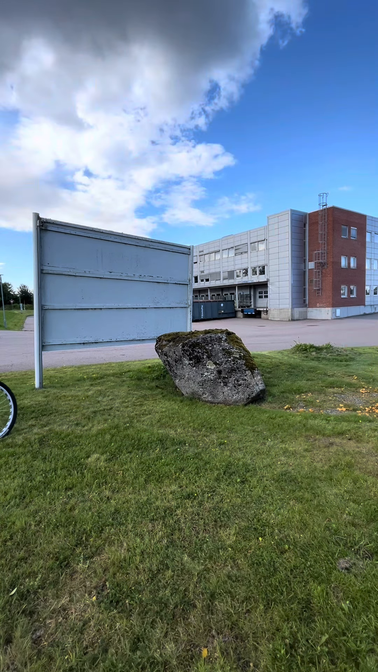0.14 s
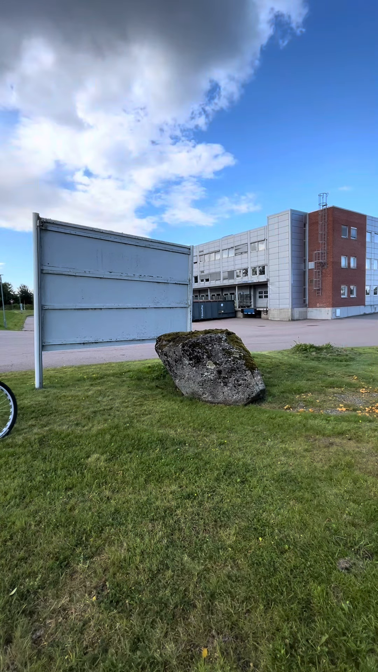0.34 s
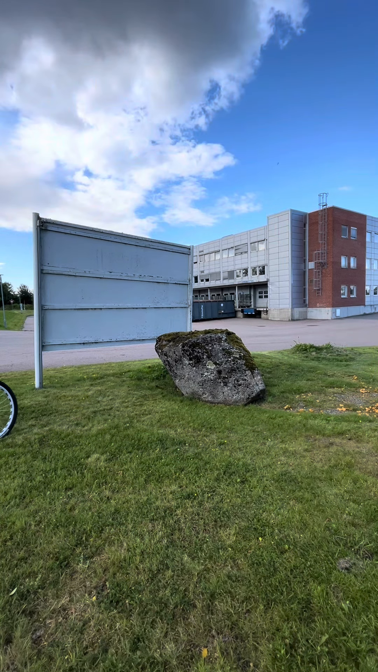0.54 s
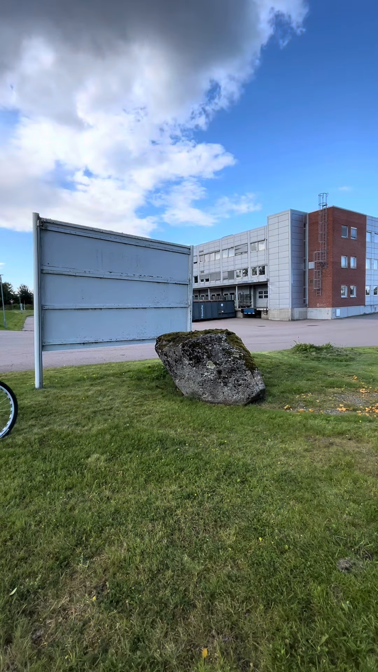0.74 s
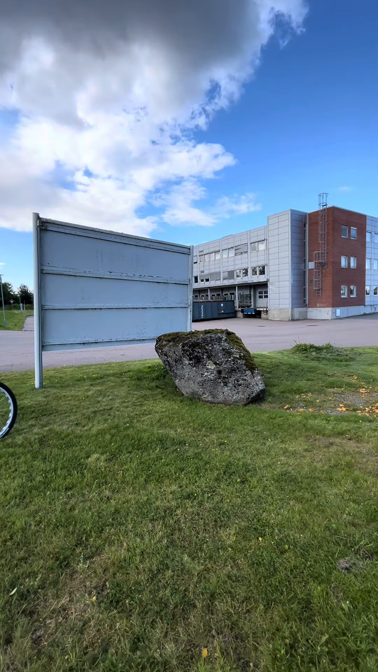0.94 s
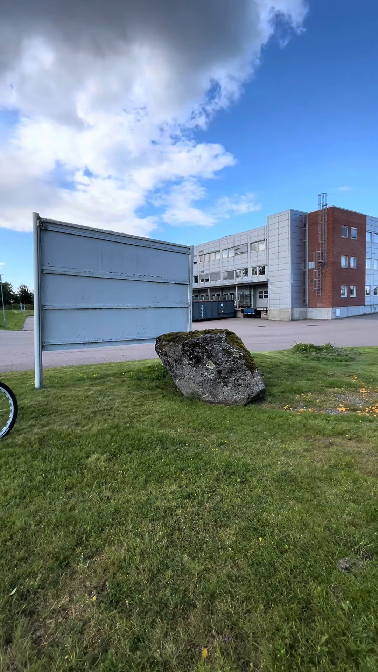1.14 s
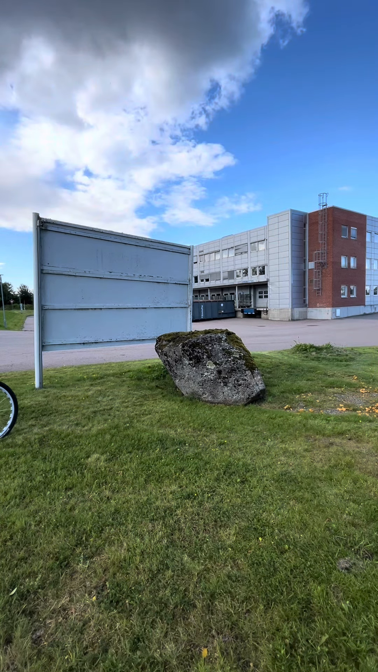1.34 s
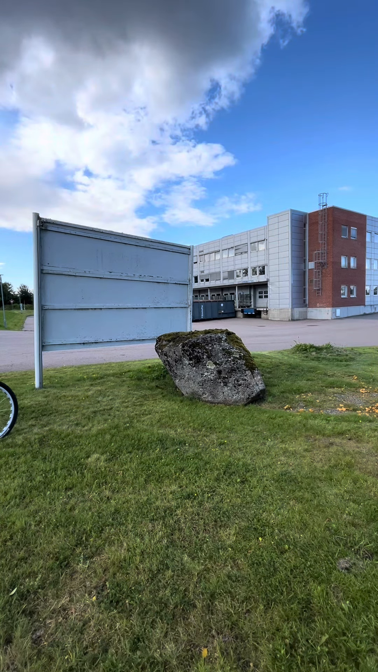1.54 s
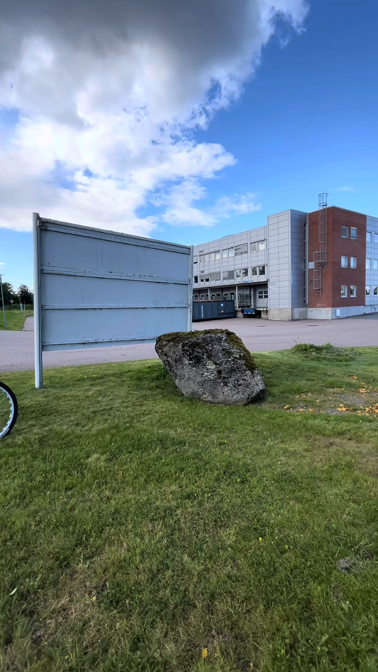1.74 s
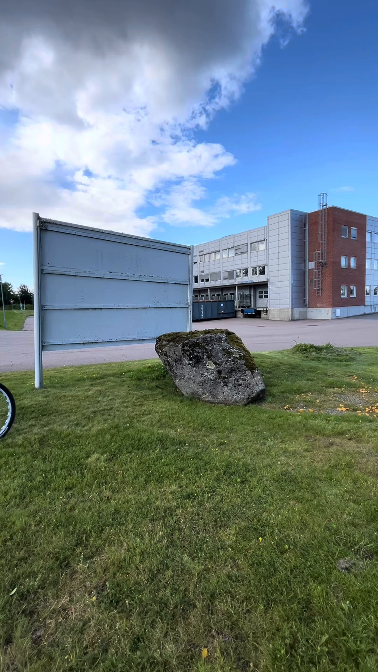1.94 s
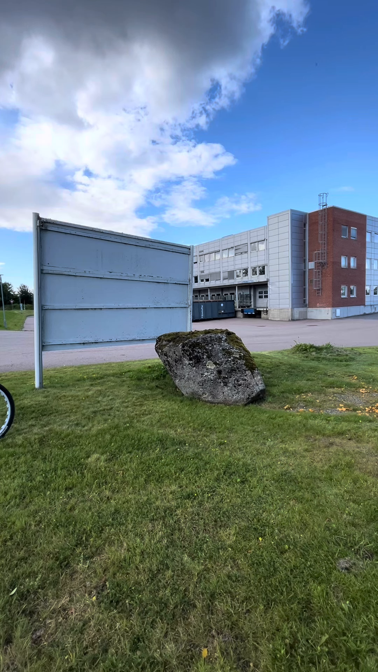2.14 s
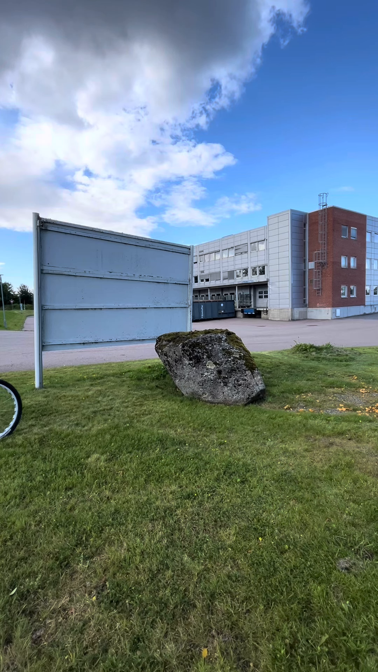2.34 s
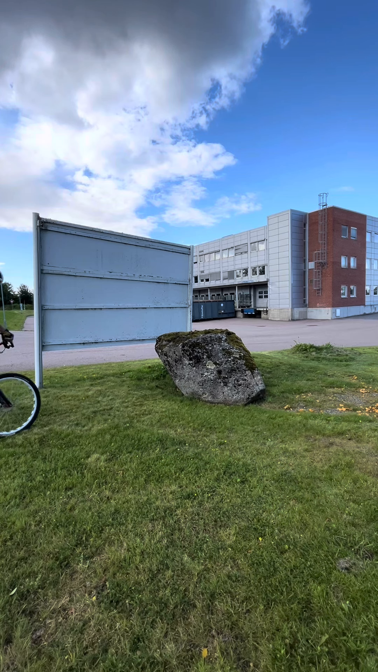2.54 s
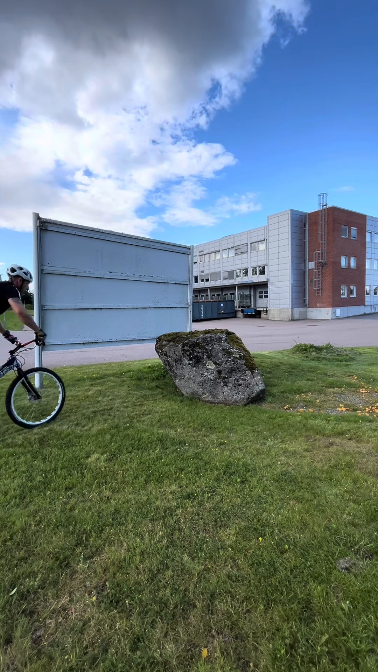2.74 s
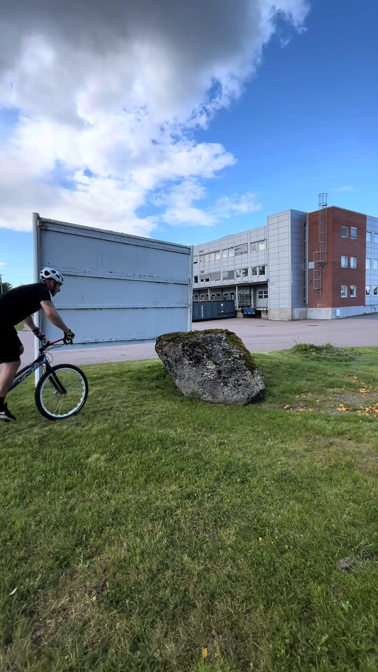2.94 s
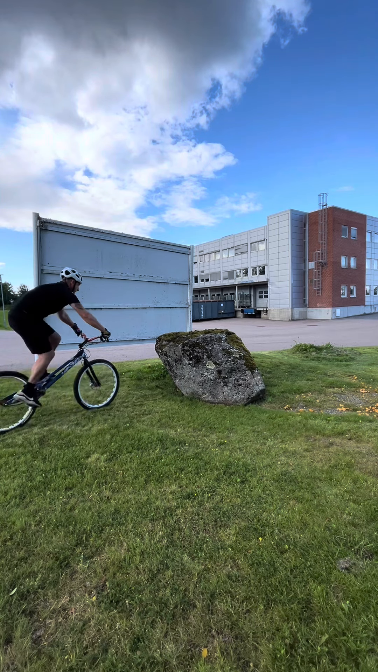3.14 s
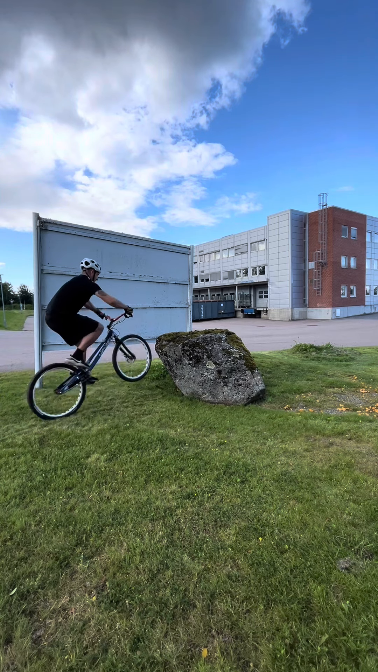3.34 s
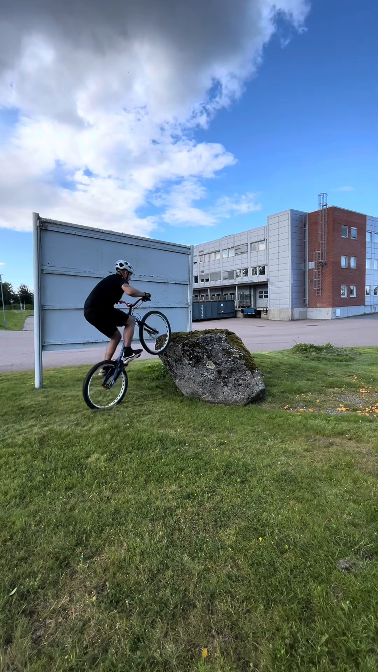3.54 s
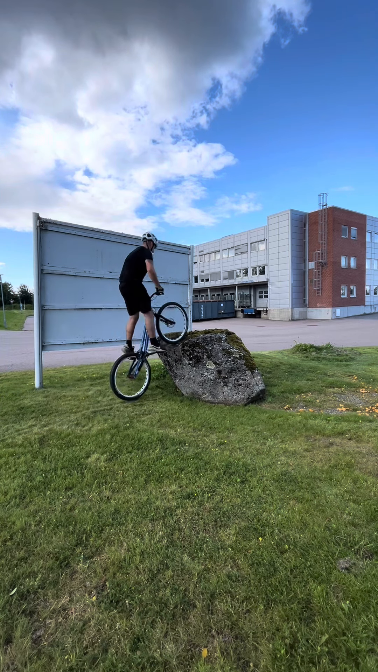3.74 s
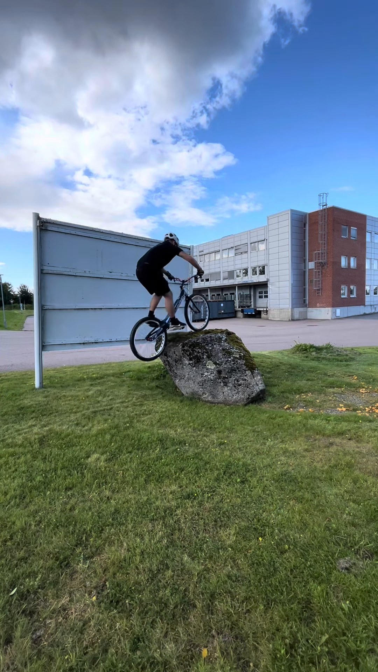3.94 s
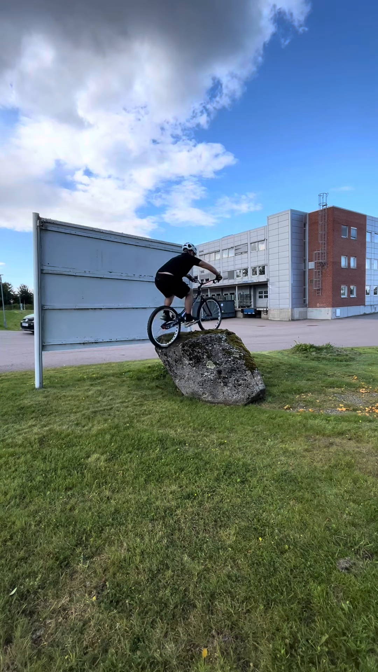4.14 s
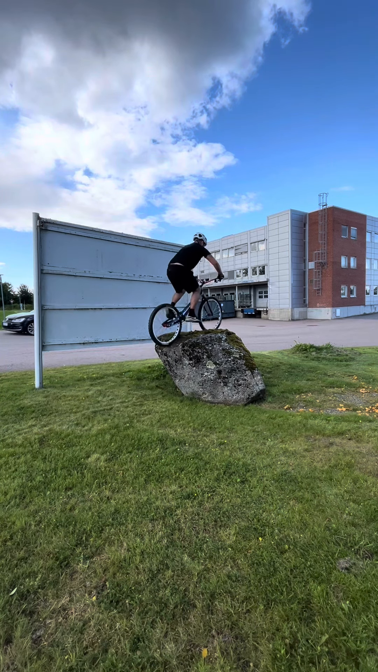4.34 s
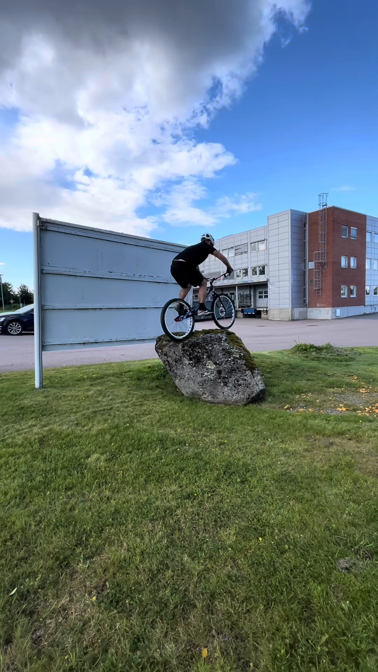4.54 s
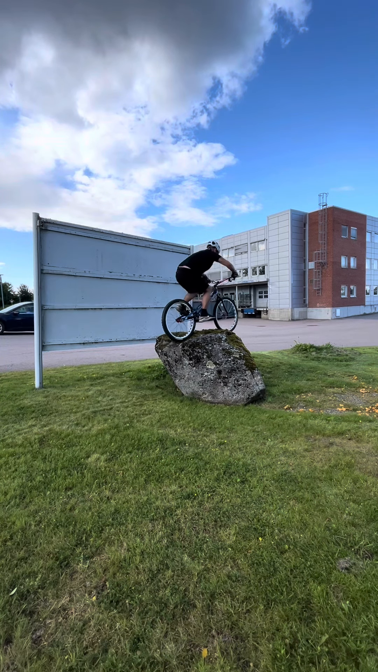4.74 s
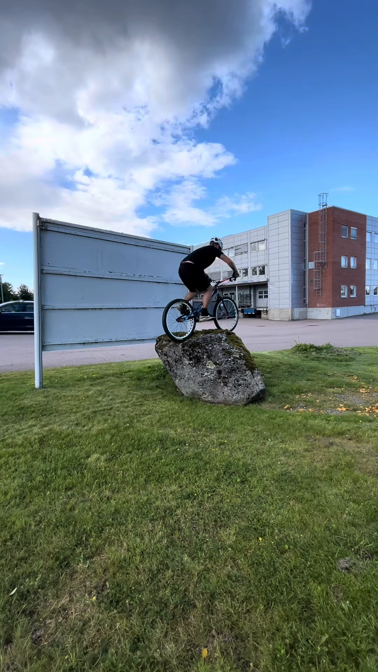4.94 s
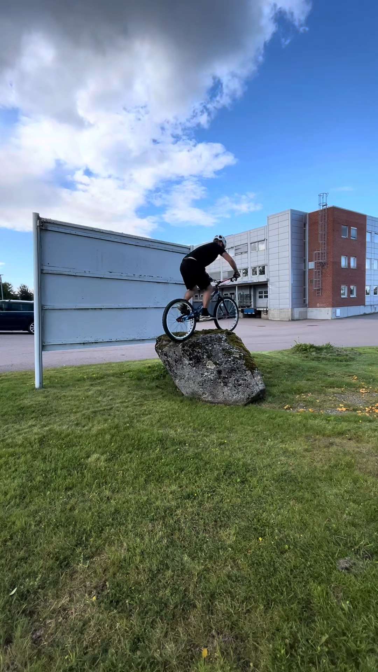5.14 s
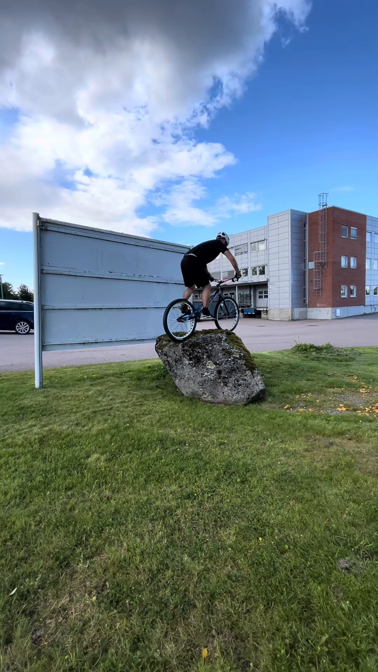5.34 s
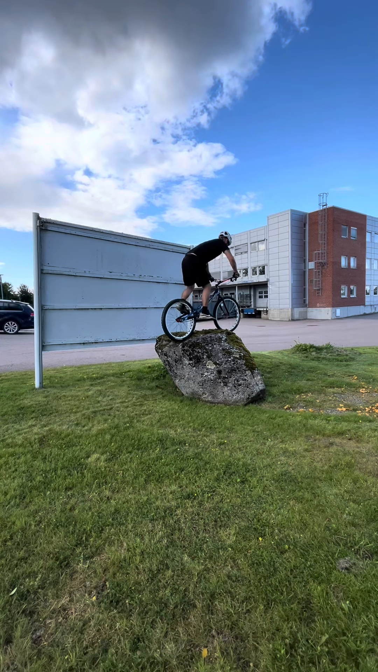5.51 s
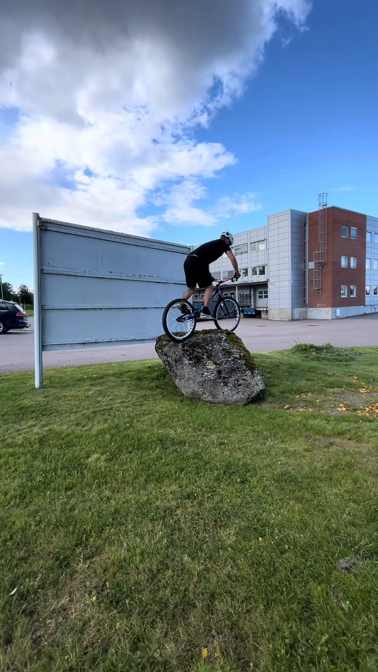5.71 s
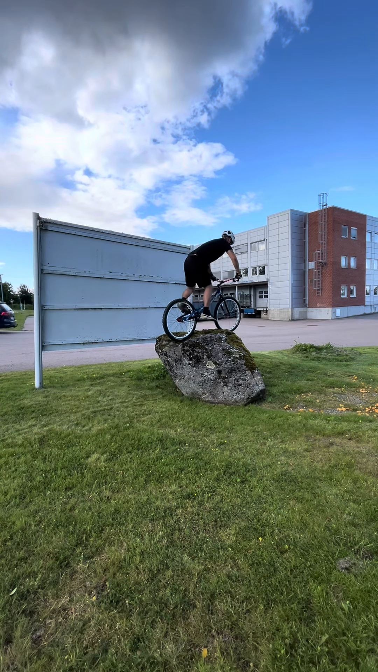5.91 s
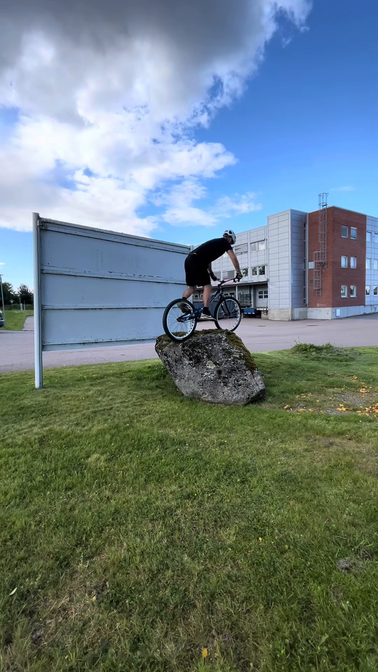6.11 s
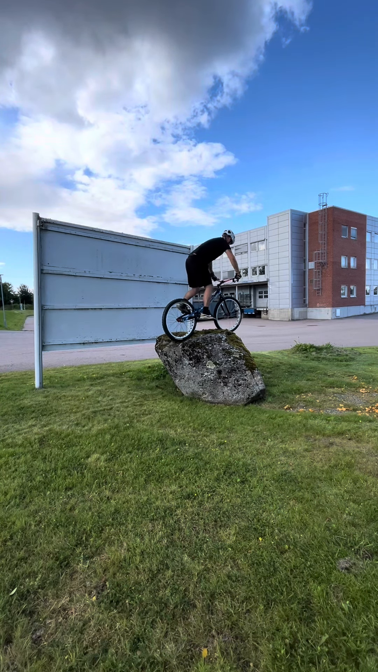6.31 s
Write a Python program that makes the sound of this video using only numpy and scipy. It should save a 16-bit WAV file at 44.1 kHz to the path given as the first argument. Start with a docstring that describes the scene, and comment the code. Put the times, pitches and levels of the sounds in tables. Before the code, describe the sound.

Wind buffets the microphones over distant traffic and a steady hum while a bicycle freewheel ticks close by. The ticks thicken and the chain rattles, then the bike hops onto a boulder: wheel and frame knock, the brake gives one short loud squeal, and the tyres thud softly twice. A car draws nearer in the background until the end. The sound is stereo, in an open yard with a faint echo.

```python
"""A trials bicycle in a yard, heard close on a stereo pair of microphones, with traffic far off.
At first wind buffets the microphones over the road wash and a steady hum, while the freewheel ticks
across the grass. From about 2 s a car draws nearer. Near 4 s the bicycle hops onto a boulder: wheel and
frame knock, the brake pads stick and slip on the rim in one loud squeal, and the tyres thud down.
The yard adds a faint tail to ticks, knocks and squeal; the car is still approaching at the end."""
import sys
import numpy as np
from scipy import signal
from scipy.fft import rfft, irfft, next_fast_len
from scipy.io import wavfile
from scipy.ndimage import uniform_filter1d

SR = 44100
rng = np.random.default_rng(int(sys.argv[2]) if len(sys.argv) > 2 else 0)


def digitize_waveform(pressure):
    """Quantize a signal to 16-bit integers and store it at the path in sys.argv[1].

    Rows of a 2-D input are taken as channels; values are limited to [-1, 1].
    """
    field = np.atleast_2d(pressure).T
    bounded = np.clip(field, -1, 1)
    quanta = np.round(bounded * 32767).astype(np.int16)
    wavfile.write(sys.argv[1], SR, quanta)


N = 280869


def amp(db):
    """Decibels to gain."""
    return 10 ** (np.asarray(db) / 20)


def unit_rms(x):
    """Scales to rms 1."""
    return x / np.sqrt(np.mean(x ** 2) + 1e-20)


def at_hz(table, hz, column=1):
    """Reads one column of a table over log frequency."""
    columns = np.transpose(table)
    return np.interp(np.log(hz + 1), np.log(columns[0] + 1), columns[column])


def fader(curve):
    """Gain at every sample from (time_s, level_db) rows."""
    return amp(np.interp(np.arange(N) / SR, *np.transpose(curve)))


def swells(rows, edge_s):
    """Gain at every sample from (start_s, length_s, level_db) rows with soft edges."""
    t = np.arange(N) / SR
    return sum(amp(db) * np.clip(np.minimum(t - start, start + length - t) / edge_s, 0, 1) ** 2
               for start, length, db in rows)


def add(mix, start_s, sound):
    """Mixes a sound in at its start time."""
    part = mix[round(start_s * SR):][:len(sound)]
    part += sound[:len(part)]


def resonate(x, hz, width_hz):
    """A resonance of gain 1: one decaying, turning pole."""
    radius = np.exp(-np.pi * width_hz / SR)
    return 2 * signal.lfilter([1 - radius], [1, -radius * np.exp(2j * np.pi * hz / SR)], x).real


def narrow_band(x, hz, width_hz):
    """The same resonance twice, for steeper sides."""
    return resonate(resonate(x, hz, width_hz), hz, width_hz)


def waver(count, span):
    """A random curve of rms 1, smoothed twice over span samples."""
    return unit_rms(uniform_filter1d(uniform_filter1d(rng.standard_normal(count), span), span))


def coloured(x, spectrum):
    """Gives noise a spectrum."""
    return irfft(rfft(x) * amp(at_hz(spectrum, np.fft.rfftfreq(len(x), 1 / SR))), len(x))


def noise_pair(spectrum, patchy_db):
    """Two unrelated noises sharing one spectrum and its drifting louder and softer patches."""
    frames, hz = N // 256 + 5, np.fft.rfftfreq(1024, 1 / SR)
    a, b, c, d, patches = rng.standard_normal((frames, 513, 5)).T
    patches = unit_rms(uniform_filter1d(uniform_filter1d(patches, 10, 0), 14, 1))
    spectra = np.array([a + 1j * b, c + 1j * d]) * amp(at_hz(spectrum, hz)[:, None] + patchy_db * patches)
    return unit_rms(signal.istft(spectra, nperseg=1024, noverlap=768)[1][:, :N])


def microphones(position, direct, scattered, treble_likeness):
    """Both microphones hear the direct sound; only the right one hears the scattered share."""
    treble_from_hz, right_lag_s = 5200, 2.42e-4
    size = next_fast_len(N)
    hz = np.fft.rfftfreq(size, 1 / SR)
    direct, scattered = rfft(direct, size), rfft(scattered, size)
    treble = hz > treble_from_hz
    phase = np.where(treble, -2 * np.pi * hz * right_lag_s, at_hz(position, hz))
    likeness = np.clip(np.where(treble, treble_likeness, at_hz(position, hz, column=2)), 0, 1)
    lean_left = amp(np.where(treble, 0, at_hz(position, hz, column=3)) / 2)
    right = likeness * direct * np.exp(1j * phase) + np.sqrt(1 - likeness ** 2) * scattered
    return irfft(np.array([direct * lean_left, right / lean_left]), size)[:, :N]


# Spectrum of wind on the microphones: frequency_hz, relative_db
WIND_SPECTRUM = [(20, -32), (45, 17.5), (90, 8.5), (180, 3), (300, -2), (500, -8), (900, -103)]
# Gusts, the first and strongest already blowing: start_s, length_s, level_db
GUSTS = [(-.3, 2.58, -39), (2.45, 1.2, -66), (4.0, 0.6, -64), (4.65, .5, -50), (5.45, 0.46, -66)]


def wind():
    """Right on the microphones: lumpy low buffeting that pushes the two in opposite directions."""
    lull_db = -71
    buffet, eddies = noise_pair(WIND_SPECTRUM, patchy_db=1.4) * (amp(lull_db) + swells(GUSTS, edge_s=0.23))
    return np.array([buffet + 0.27 * eddies, -buffet + 0.18 * eddies])


# Spectra of the far road's wash and low rumble: frequency_hz, relative_db
WASH_SPECTRUM = [(100, -51), (200, -11), (300, -8), (500, -12.5), (1000, -13.5), (2000, -26), (3200, -31.5),
                 (4500, -37), (7000, -40.5), (9000, -50.5), (12000, -93), (16000, -100)]
RUMBLE_SPECTRUM = [(30, 0), (60, 5), (130, -2.5), (250, -5.5), (350, -22), (600, -60)]
# Their rise and fall: time_s, level_db
WASH_LEVEL = [(0, -48.5), (3, -48.5), (4, -51), (6.37, -52)]
RUMBLE_LEVEL = [(0.0, -51), (0.35, -50), (0.55, -60), (0.8, -50), (1.3, -42.5), (1.5, -47.5), (1.75, -40),
                (1.95, -46), (2.3, -44), (3.3, -43.5), (4.4, -48.5), (4.8, -44.5), (5.5, -42.5),
                (6.37, -41)]
# The far road at the pair: frequency_hz, right_lead_rad, likeness_0_to_1, left_minus_right_db
ROAD_POSITION = [(39, 2, 1, 0), (199, 0.26, 1, -0.5), (380, 0, 1, -10.5), (495, 0.65, 0.77, -7),
                 (796, 4.5, 0.2, -4), (1090, 4.5, 0.38, -1.5), (1590, 7, 0.53, 0), (2460, 4, 0.77, -2),
                 (3460, 4, 0.2, -3.5), (4270, -8, 0.97, -1)]


def far_traffic():
    """In the distance: road wash, a rumble that comes in lumps, and a steady narrow hum."""
    hum_hz, hum_db, lump_db, lump_s = 363, -55.5, 2.5, 0.15
    drift = unit_rms(narrow_band(rng.standard_normal(N), hum_hz, width_hz=9))
    hum = amp(hum_db) * (np.sin(2 * np.pi * hum_hz * np.arange(N) / SR) + .3 * drift)
    lumps = amp(lump_db * waver(N, round(lump_s * SR)))
    wash = noise_pair(WASH_SPECTRUM, patchy_db=1.0) * fader(WASH_LEVEL)
    rumble = noise_pair(RUMBLE_SPECTRUM, patchy_db=0.84) * fader(RUMBLE_LEVEL) * lumps
    direct, scattered = wash + rumble
    return microphones(ROAD_POSITION, direct + hum, scattered, treble_likeness=.75)


# Freewheel and chain ticks: start_s, peak_db, brightest_pitch_hz
TICKS = [(0.1068, -44, 3900), (0.124, -37.5, 6600), (0.4385, -52, 3190), (0.9482, -54, 7600),
         (1.075, -63, 7600), (1.5305, -31, 8900), (1.5903, -30, 8820), (1.6, -32, 5240),
         (1.6797, -30, 12200), (1.7353, -42, 5190), (2.1745, -53, 4100), (2.4545, -45, 3640),
         (2.4897, -44, 8270), (2.5342, -42.5, 3310), (2.7752, -41, 8050), (2.7887, -33.5, 7580),
         (2.808, -34, 8990), (2.826, -31.5, 7810), (2.8465, -33, 7600), (2.867, -32, 12000),
         (2.8889, -33, 8900), (2.9273, -30, 4660), (2.9536, -41, 3110), (3.211, -43.5, 3040),
         (3.237, -39, 3210), (3.418, -48, 3230), (3.624, -41, 6990), (3.632, -30, 8900),
         (3.7549, -26, 3860), (3.778, -31, 8260), (3.8008, -27.5, 4150), (3.8627, -27, 3940),
         (3.8837, -31.5, 3000), (3.9082, -25.5, 3750), (3.9604, -29, 3500), (3.976, -31, 8900),
         (3.992, -30.5, 4000), (4.008, -29, 12300), (4.0237, -32, 4500), (4.04, -34, 8900),
         (4.06, -31, 8980), (4.0688, -26, 4760), (4.586, -43, 3190), (5.963, -38, 3800)]
# Spectrum of a pawl's or link's click: frequency_hz, relative_db
TICK_SPECTRUM = [(700, -4), (1500, -1), (2500, -5), (3300, -5), (4500, -6), (6000, -7), (8000, -7),
                 (10000, -7), (12500, -6.5), (14500, -11), (16500, -28)]
# Hub and spoke resonances that a tick rings: pitch_hz, width_hz, gain_db
HUB_MODES = [(3250, 200, 10), (3950, 220, 12), (5150, 350, 6), (7600, 450, 6), (8900, 450, 6),
             (9800, 450, 6), (12300, 700, 6)]
# Chain rattle after each jolt: start_s, length_s, level_db
RATTLES = [(2.76, .21, -48), (3.745, 0.12, -49), (3.815, 0.045, -47), (3.855, 0.065, -47),
           (3.925, 0.05, -40), (3.95, 0.13, -43.5), (4.2, 0.088, -58), (4.58, 0.1, -54.5)]


def freewheel():
    """Close by: each pawl lands and bounces once, ringing hub and spokes; chain links rattle between."""
    out, t = np.zeros(N), np.arange(4096) / SR
    contact_s, bounce_s = 0.0019, 0.0047
    strike = 0.65 * np.exp(-t / 0.00059) + np.exp(-(t / contact_s) ** 2)
    bounce = 0.81 * np.exp(-((t - bounce_s) / contact_s) ** 2)
    tail = amp(-8.5 - 60 * t / 0.15)
    envelope = (strike + bounce + tail) * np.minimum(t / 0.0003, 1)
    for start_s, peak_db, brightest_hz in TICKS:
        burst = unit_rms(coloured(rng.standard_normal(len(t)), TICK_SPECTRUM)) * envelope
        octaves_off = np.log2(np.transpose(HUB_MODES)[0] / brightest_hz)
        struck_db = 2 * rng.standard_normal(len(HUB_MODES)) - 14 * octaves_off ** 2
        tick = burst + sum(amp(db + struck) * resonate(burst, hz, width)
                           for (hz, width, db), struck in zip(HUB_MODES, struck_db))
        add(out, start_s, amp(peak_db) * tick / abs(tick).max())
    links_per_s, link_t60_s = 900, 0.026
    hits = amp(3 * np.minimum(rng.exponential(1, N), 4)) * (rng.random(N) < links_per_s / SR)
    links = signal.oaconvolve(hits, amp(-60 * t[:900] / link_t60_s))[:N] * rng.standard_normal(N)
    return out + swells(RATTLES, edge_s=0.024) * unit_rms(coloured(links, TICK_SPECTRUM))


# Engine notes that swell and fade: start_s, length_s, first_pitch_hz, last_pitch_hz, level_db
ENGINE_NOTES = [(1.95, 1.52, 88, 64.1, -48), (3.3, 1.8, 74, 53.2, -49.5), (4.5, 0.41, 70.1, 53.9, -50),
                (4.9, 0.58, 145.5, 141.3, -38.5), (5.46, 0.36, 141.7, 140.3, -38.5),
                (5.15, 0.47, 50, 52, -47), (5.3, 0.67, 89.9, 110.7, -46), (5.95, 0.57, 98.3, 119.6, -39.5)]
# Spectrum of the car's tyre roar: frequency_hz, relative_db
ROAR_SPECTRUM = [(30, -29), (60, -2), (120, 0), (250, -15), (500, -8), (1000, -13), (2000, -22),
                 (3200, -19), (4500, -26.5), (5800, -28), (7000, -28), (9000, -39.5), (12000, -48),
                 (14000, -44), (16000, -70)]
# The roar grows as the car nears: time_s, level_db
ROAR_LEVEL = [(2.5, -56), (3.2, -52.5), (4.4, -44.5), (4.8, -47), (5.6, -41.5), (6.37, -40.5)]
# The car at the pair: frequency_hz, right_lead_rad, likeness_0_to_1, left_minus_right_db
CAR_POSITION = [(39.6, 0.5, 0.9, -0.5), (190, 0.72, 0.89, -2), (348, 0.2, 0.61, 0), (566, -1, 0.44, -5),
                (940, -3, 0.12, 3), (1090, -0.5, 0.54, 6.5), (1530, 1.4, 1, 5), (2540, -3, 0.73, 3),
                (3530, -6.5, 0.39, -2.5), (4930, -8.5, 0.91, 3.5)]


def approaching_car():
    """In the background, coming closer: tyre roar and engine notes that waver in pitch and level."""
    wobble_share, throb_db = 0.012, 2.5
    engine = np.zeros(N)
    for start_s, length_s, first_hz, last_hz, db in ENGINE_NOTES:
        progress = np.arange(0, 1, 1 / (length_s * SR))
        wobble = unit_rms(uniform_filter1d(rng.standard_normal(2 * SR), 2000))[:len(progress)]
        throb = waver(2 * SR, 1400)[:len(progress)]
        pitch_hz = (first_hz + (last_hz - first_hz) * progress) * (1 + wobble_share * wobble)
        note = np.sqrt(2) * np.sin(2 * np.pi * np.cumsum(pitch_hz) / SR)
        add(engine, start_s, amp(db + throb_db * throb) * note * np.sin(np.pi * progress) ** 0.36)
    roar, scattered = noise_pair(ROAR_SPECTRUM, patchy_db=1.0) * fader(ROAR_LEVEL)
    return microphones(CAR_POSITION, roar + engine, scattered, treble_likeness=.8)


# Knocks on wheel and frame: start_s, peak_db, part_pitch_hz, blow_ms
KNOCKS = [(3.275, -33.5, 1650, 0.6), (3.312, -39, 1900, 1.8), (3.7036, -21, 1320, 0.064),
          (3.761, -35.5, 1290, 4.7), (4.074, -34, 2390, 7.4), (4.08, -21, 1080, 6.9),
          (4.091, -22, 1370, 5.9), (4.391, -25, 1090, 0.3), (4.563, -36, 1500, 0.4),
          (4.585, -32.5, 2700, 4.5), (4.606, -25.5, 1720, 3.7), (4.608, -30.5, 3260, 2.7),
          (4.614, -23, 780, 6.5), (4.633, -29, 1430, 2.3), (4.64, -40.5, 4580, 4.1),
          (4.654, -38.5, 1570, 8.8), (5.961, -33.5, 1950, 1)]
# Modes of wheel and frame: pitch_hz, width_hz, relative_db
FRAME_MODES = [(779, 46, 14), (1060, 370, 11.5), (1266, 56, 3), (1383, 160, 10), (1500, 21, 2.5),
               (1920, 71, -3), (2310, 70, 1), (2690, 50, 7), (3220, 75, -9), (4100, 90, -18), (4580, 50, 2)]


def knocks():
    """Close by: a gritty blow or scrape rings the wheel and frame modes nearest the struck part's pitch."""
    out, t = np.zeros(N), np.arange(4096) / SR
    band = signal.butter(3, [600, 6500], "band", fs=SR, output="sos")
    steady_push = 2.5  # against grit of rms 1
    for start_s, peak_db, part_hz, blow_ms in KNOCKS:
        age = 1000 * t / blow_ms
        blow = (steady_push + rng.standard_normal(len(t))) * age * np.exp(-age)
        ring = amp(-6.5) * narrow_band(blow, part_hz, width_hz=1400)
        for hz, width, db in FRAME_MODES:
            gain = amp(db - 56 * np.log2(hz / part_hz) ** 2) * np.sqrt(100 / width)
            ring += gain * resonate(resonate(blow, hz, 4 * width), hz, width)
        ring = signal.sosfilt(band, ring)
        add(out, start_s, amp(peak_db) * ring / abs(ring).max())
    return out


# The rim's note bends up as the pads grab and again as they let go: time_s, pitch_hz
RIM_PITCH = [(4.07, 519.5), (4.115, 519.5), (4.135, 525.5), (4.18, 525.7), (4.25, 524.7), (4.285, 530),
             (4.48, 530)]
# Higher rim modes that the slip drives: pitch_hz, against_overtones_db, delay_ms
RIM_MODES = [(1596, -4, -2), (1538, -12.5, 22), (3090, -17.5, 18), (3230, -15, -15), (4180, -16.5, 10),
             (4675, -21, 10)]


def rim_ring(t, times_s, note_db, overtones_db):
    """The slipping pads drive the rim's main note and its higher modes, which flutter in level."""
    flutter_db = 2.5
    cycles = np.cumsum(np.interp(t, *np.transpose(RIM_PITCH))) / SR
    ring = uniform_filter1d(amp(np.interp(t, times_s, note_db)), 250) * np.sin(2 * np.pi * cycles)
    for hz, db, delay_ms in RIM_MODES:
        drive_db = db + np.interp(t - delay_ms / 1000, times_s, overtones_db, left=-90)
        flutter = amp(flutter_db * waver(N // 8, 200)[:len(t)])
        ring += uniform_filter1d(amp(drive_db), 250) * flutter * np.sin(2 * np.pi * (hz * t + rng.random()))
    return ring


# Harmonics of the slip, from the second up: against_overtones_db, judder_lag_ms
SLIP_HARMONICS = [(1.5, 6.5), (-6.5, 1.5), (-6, 12), (-10, 6), (-8.5, 1), (-15, 11), (-14.5, 12),
                  (-16.5, 8.1)]


def slip_overtones(t, times_s, slip_cycles, overtones_db):
    """Stick-slip gives juddering harmonics; below full strength the upper ones fall away faster."""
    judder_hz, judder_peak_s, judder_depth = 49.54, 3.7, 0.35
    full_db, dulling_per_harmonic, flutter_db = -12, 0.054, 1.6
    shortfall_db = np.minimum(overtones_db - full_db, 0)
    out = np.zeros(len(t))
    for k, (db, lag_ms) in enumerate(SLIP_HARMONICS, 2):
        flutter = amp(flutter_db * waver(N // 8, 200)[:len(t)])
        wander = 0.006 * k * waver(N // 8, 150)[:len(t)]
        judder = 1 + judder_depth * np.cos(2 * np.pi * judder_hz * (t - judder_peak_s - lag_ms / 1000))
        level_db = overtones_db + db + dulling_per_harmonic * (k - 2) * shortfall_db
        gain = uniform_filter1d(amp(np.interp(t, times_s, level_db)), 250) * judder * flutter
        out += gain * np.sin(2 * np.pi * (k * slip_cycles + wander + rng.random()))
    return out


# The brake grabs, squeals and rings out: time_s, slip_rate_hz, rim_note_db, overtones_db, treble_rub_db
SQUEAL = [(4.066, 517, -62, -62, -39), (4.082, 518.8, -48, -46, -34.5), (4.098, 524, -29, -47, -42),
          (4.124, 538.2, -38, -47, -44.5), (4.138, 537.2, -26, -29, -36.5), (4.152, 530.4, -17.5, -22, -32),
          (4.166, 526.4, -17, -22.5, -33), (4.182, 520.5, -14, -25, -39.5), (4.2, 516.6, -18.5, -34, -40),
          (4.222, 520.8, -34.5, -39.5, -48.5), (4.258, 534.8, -31, -43, -51), (4.276, 529, -49, -45, -62),
          (4.297, 524, -32.5, -64, -49.5), (4.34, 531.6, -52, -51, -58), (4.388, 519.4, -62, -49.5, -65),
          (4.48, 536, -75, -60, -78)]
# Spectrum of the pads rubbing on the rim: frequency_hz, relative_db
RUB_SPECTRUM = [(700, -14), (1300, -7), (2400, -5), (3400, -4), (4400, -9), (6000, -8), (8000, -14),
                (10000, -12), (12500, -14), (15000, -19), (16500, -32)]
# Thin rings as the squeal dies, probably spokes: start_s, length_s, pitch_hz, width_hz, level_db
AFTER_RINGS = [(4.2, 0.07, 3300, 260, -55), (4.28, 0.08, 3530, 300, -51), (4.343, 0.099, 2620, 30, -53)]


def brake():
    """Close and loud: the squeal, rubbing that pulses with each slip, and faint after-rings."""
    times_s, slip_hz, note_db, overtones_db, rub_db = np.transpose(SQUEAL)
    t = np.arange(times_s[0], times_s[-1], 1 / SR)
    slip_cycles = np.cumsum(np.interp(t, times_s, slip_hz)) / SR
    tone = rim_ring(t, times_s, note_db, overtones_db)
    tone += slip_overtones(t, times_s, slip_cycles, overtones_db)
    pulses = 0.56 + np.exp(-(slip_cycles % 1) / 0.57)
    friction = pulses * rng.standard_normal((2, N // 8))[:, :len(t)]
    rub = np.array([coloured(side, RUB_SPECTRUM) for side in friction])
    treble = signal.sosfilt(signal.butter(4, 5000, "high", fs=SR, output="sos"), rub)
    direct_rub, scattered_rub = amp(np.interp(t, times_s, rub_db)) * rub / np.std(treble)
    direct, scattered, hiss = np.zeros(N), np.zeros(N), rng.standard_normal(N)
    for start_s, length_s, hz, width, db in AFTER_RINGS:
        direct += swells([(start_s, length_s, db)], edge_s=0.015) * unit_rms(narrow_band(hiss, hz, width))
    fade = signal.windows.tukey(len(t), .04)
    add(direct, times_s[0], (np.sqrt(2) * tone + direct_rub) * fade)
    add(scattered, times_s[0], amp(1.5) * scattered_rub * fade)
    return direct, scattered


# The tyres land on the boulder: start_s, peak_db
LANDINGS = [(4.226, -32), (4.702, -34)]
# A tyre's low notes: pitch_hz, relative_db, t60_s
TYRE_MODES = [(104, 0, 0.27), (146.8, 0, 0.34)]


def tyre_landings():
    """On the boulder, alike in both microphones: dull thuds of air in the squashed tyres."""
    out, t = np.zeros(N), np.arange(SR // 3) / SR
    squash_s = 0.026
    thud = sum(amp(db - 60 * t / t60) * np.sin(2 * np.pi * hz * t) for hz, db, t60 in TYRE_MODES)
    thud *= 1 - np.exp(-t / squash_s)
    for start_s, peak_db in LANDINGS:
        add(out, start_s, amp(peak_db) * thud / abs(thud).max())
    return out


def yard_tail(sound):
    """Walls and boulder send back sparse, dull echoes; two unrelated tails, for width."""
    echoes_per_s, t60_s, gap_s = 2000, 1.8, .02
    t = np.arange(SR // 2) / SR
    echoes = rng.choice([-1., 1.], (2, len(t))) * (rng.random((2, len(t))) < echoes_per_s / SR)
    echoes *= amp(-60 * t / t60_s) * (t > gap_s)
    echoes *= amp(-27) / np.linalg.norm(echoes[0])
    dull = signal.lfilter(*signal.butter(1, 2500, fs=SR), sound)
    return signal.fftconvolve(dull[None], echoes, axes=1)[:, :N]


# The bicycle at the pair: frequency_hz, right_lead_rad, likeness_0_to_1, left_minus_right_db
BICYCLE_POSITION = [(200, 0.8, 1, 3), (525, 1.08, 0.86, -12), (800, 1.2, 0.88, -2), (1100, 0.4, 0.44, -3.5),
                    (1540, 0.16, 1, 1.5), (2380, -1.95, 1, 0), (3080, -2, 0.91, -2.5),
                    (4320, -2, 0.98, 0.5), (4530, -2, 1, -5.5)]


def scene():
    """Bicycle in front, road behind; some ticking and rubbing reaches the right microphone scattered."""
    squeal, scattered_rub = brake()
    bicycle = freewheel() + knocks() + squeal
    scattered = freewheel() + scattered_rub
    tail, other_tail = yard_tail(bicycle)
    near = microphones(BICYCLE_POSITION, bicycle + tail, scattered, treble_likeness=0.88)
    width = np.array([other_tail - tail, tail - other_tail])
    return near + width + tyre_landings() + far_traffic() + approaching_car() + wind()


def record(dry):
    """The microphones cut the lowest bass; a steep band limit takes off the highest treble."""
    low_cut_hz, band_limit_hz = 38, 16400
    cut = signal.sosfilt(signal.butter(5, low_cut_hz, "high", fs=SR, output="sos"), dry)
    band_limit = signal.firwin(1023, band_limit_hz, window=("kaiser", 9), fs=SR)
    return signal.oaconvolve(cut, band_limit[None], "same")


dry = scene()
out = record(dry)
digitize_waveform(out)
```